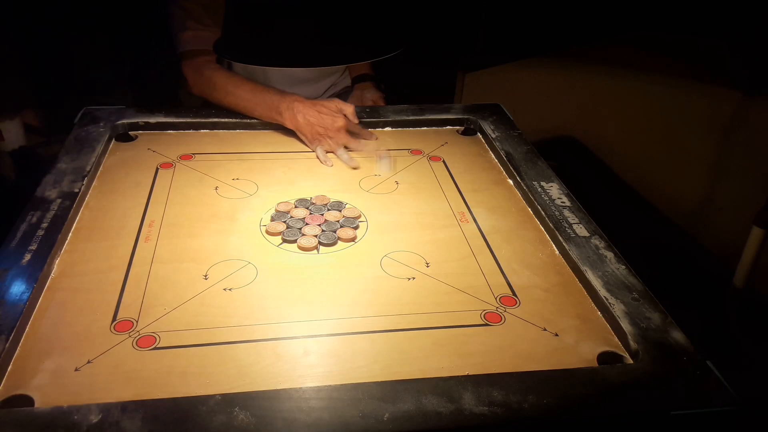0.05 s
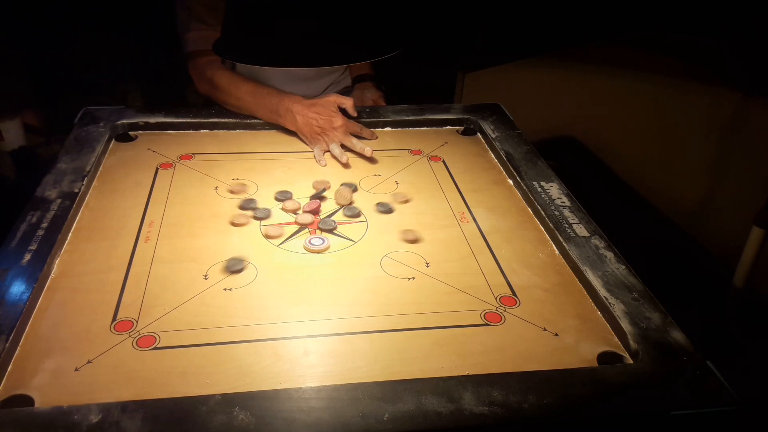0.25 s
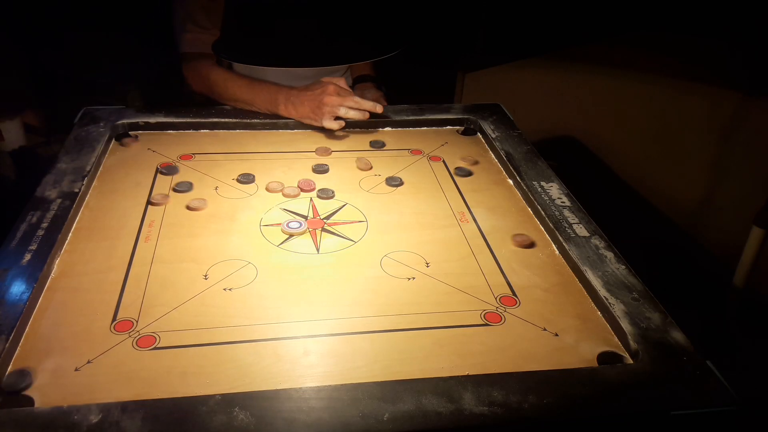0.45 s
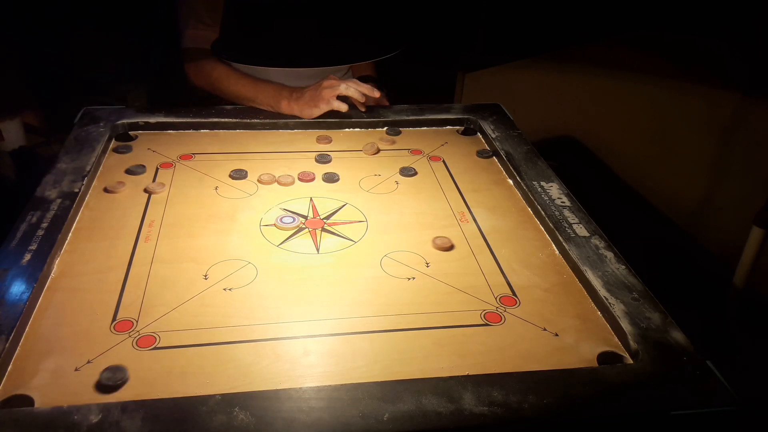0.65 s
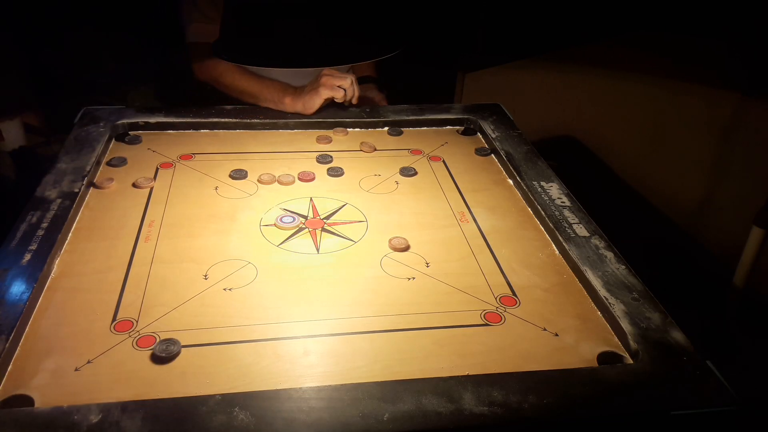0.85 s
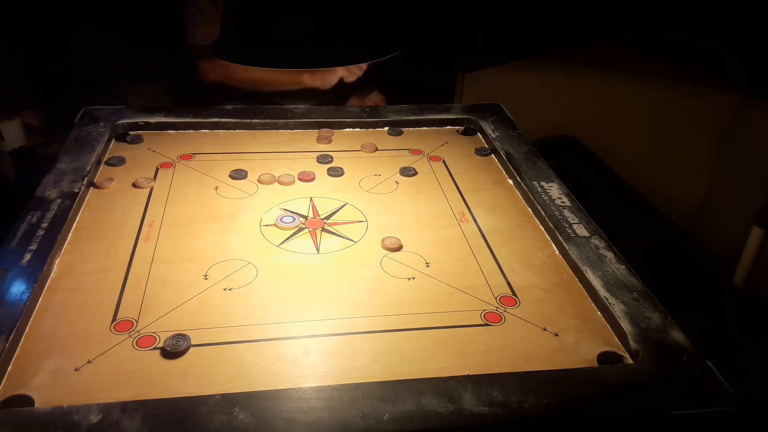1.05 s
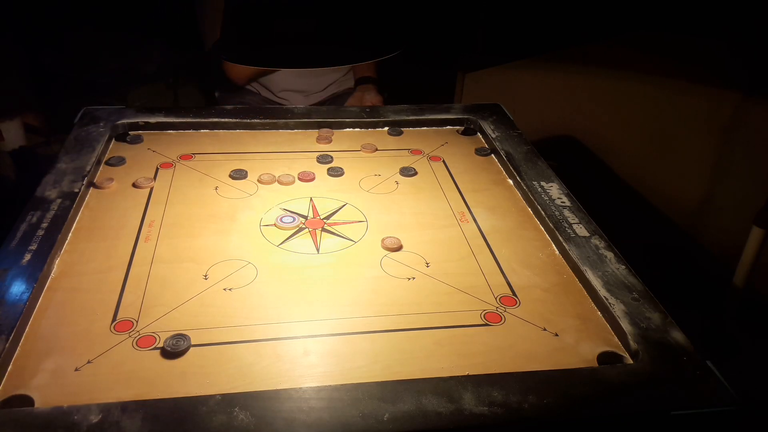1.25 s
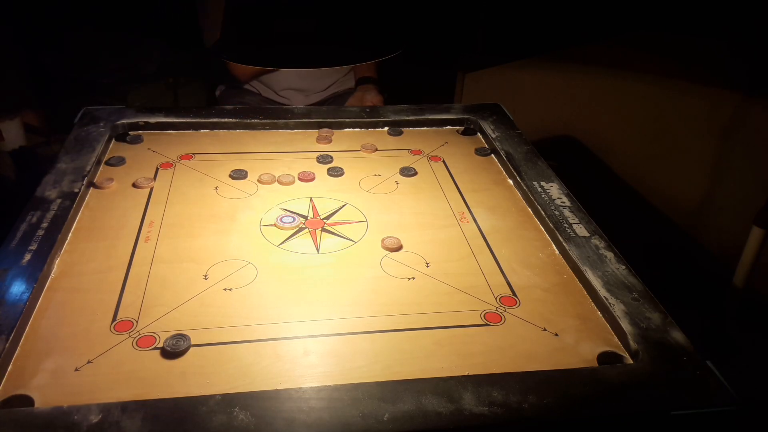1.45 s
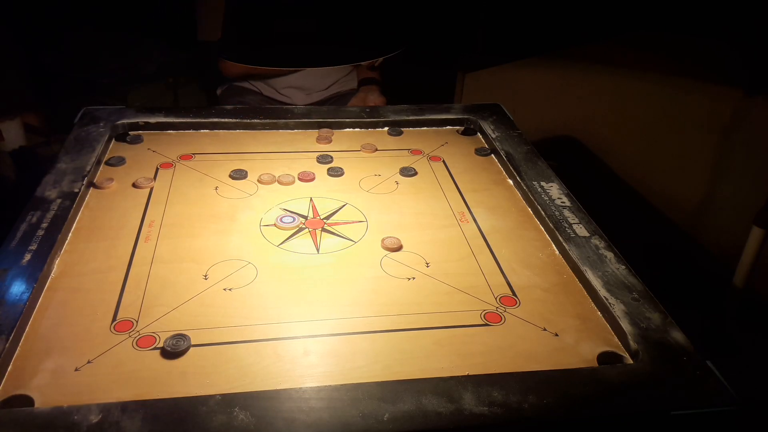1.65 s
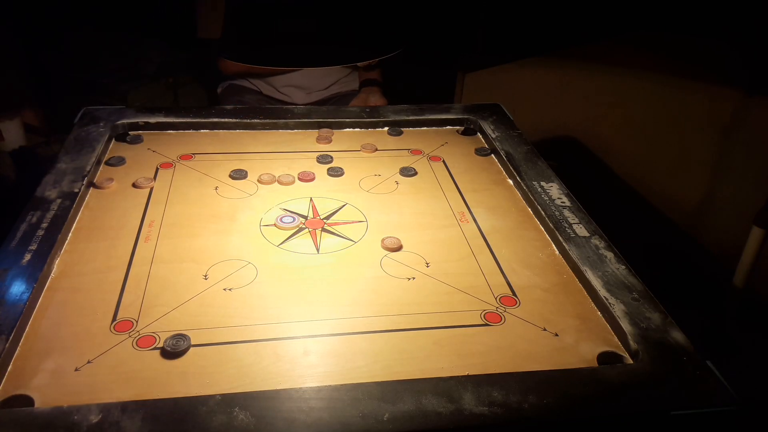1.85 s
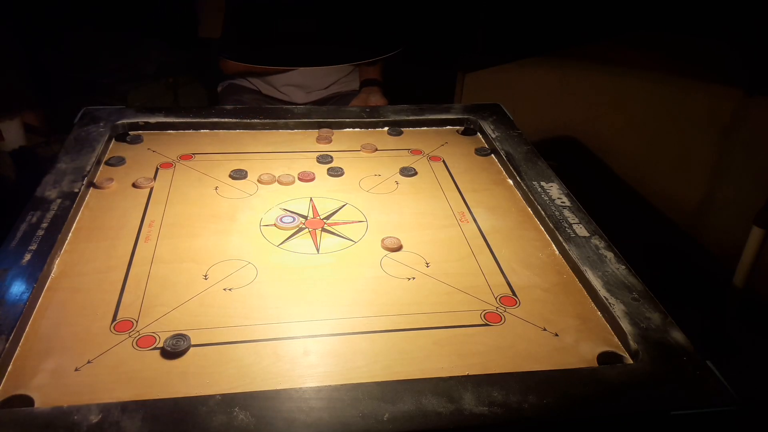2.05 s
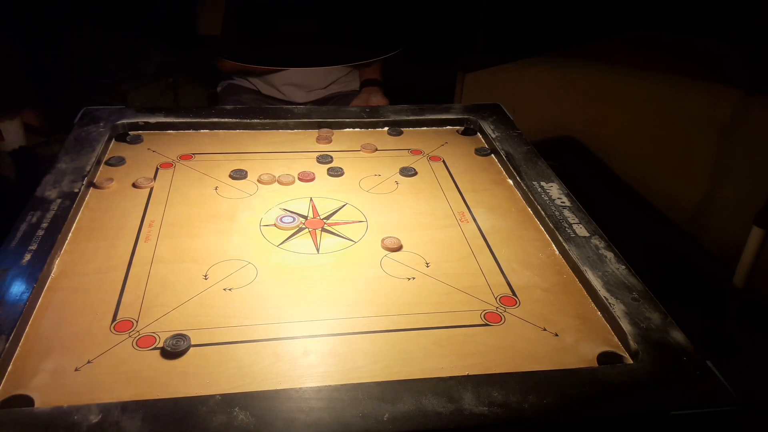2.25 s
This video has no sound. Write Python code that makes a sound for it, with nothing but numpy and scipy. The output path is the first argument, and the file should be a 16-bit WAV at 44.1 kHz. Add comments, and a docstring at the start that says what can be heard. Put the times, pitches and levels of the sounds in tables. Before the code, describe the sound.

Wooden carrom discs burst apart with a sharp crack, just after a soft flick. They clack and slide across the board, hitting the rails ever more faintly with a short room echo, until only a low room noise remains.

```python
"""Indoors, in a hard-walled room: a carrom break. After a few muffled bumps the striker cracks into a
cluster of wooden discs, and the board flexes with a thump. The discs slide apart, clack against each
other and knock on the rails; each impact excites resonant modes of the wood and reverberates in the room.
Automatic gain control ducks the steady room noise at the break and lets it swell back a second later."""
import sys
import numpy as np
from scipy import signal
from scipy.fft import rfft, irfft
from scipy.io import wavfile
from scipy.ndimage import uniform_filter1d, minimum_filter1d

SR = 44100
rng = np.random.default_rng(int(sys.argv[2]) if len(sys.argv) > 2 else 0)


def int16_out(signal):
    """Quantize to a 16-bit WAV file."""
    q = np.round(np.clip(np.atleast_2d(signal).T, -1, 1) * 32767)
    wavfile.write(sys.argv[1], SR, q.astype(np.int16))


N = 101429

# Spectral shapes, as relative power per hertz: frequency_hz, density_db
ROOM_NOISE_SPECTRUM = [(15, -47), (25, -8.5), (69, -7), (178, 0.5), (253, -8), (297, -5), (421, -7.5),
                       (552, -6), (782, -8.5), (871, -6.5), (1380, -9.5), (2850, -16), (6550, -28.5),
                       (9050, -39), (13500, -35), (15500, -43)]
BUMP_SPECTRUM = [(50, -11), (150, -10), (270, 2.5), (500, -1), (700, -8), (1500, -27), (8000, -51)]
FRICTION_SPECTRUM = [(100, -30), (700, -16), (1500, -0.5), (3000, -3), (5000, -12), (9000, -42),
                     (15000, -34)]
KNOCK_SPECTRUM = [(60, -23), (300, -16.5), (480, -12), (620, -12.5), (800, -2.5), (1000, -3), (1400, 0),
                  (2300, 0.5), (3800, -3), (5500, -13), (7000, -17), (9000, -31), (12000, -29),
                  (14500, -38), (15700, -53.5)]
CLACK_SPECTRUM = [(60, -14.5), (250, -9), (400, -12), (800, -5), (1300, -2.5), (2200, 1), (3200, 0),
                  (4600, -3), (5700, -2.5), (6600, -7.5), (7600, -9), (9200, -20.5), (10500, -20),
                  (12500, -28), (14700, -28), (15700, -36)]
CRACK_SPECTRUM = [(60, -26), (300, -20), (380, -12), (450, -7.5), (520, -13.5), (590, -3), (680, -5.5),
                  (800, -2), (1000, -6), (1400, -2), (2100, -2), (3000, -2.5), (4000, -1.5), (4700, -7.5),
                  (5600, -12), (6600, -14), (7800, -25), (9000, -30), (10500, -25), (12000, -31),
                  (14700, -32), (15700, -42)]
# Likeness of left and right room noise: frequency_hz, correlation
ROOM_NOISE_CORRELATION = [(50, 0.9), (240, 0.82), (480, 0.76), (950, -0.05), (1900, 0.021), (4000, -0.15),
                          (15000, 0.17)]
# Faint hums in the room: start_s, end_s, pitch_hz, half_width_hz, level_db
ROOM_HUMS = [(0, 2.9, 176, 21, -51), (0.7, 1.17, 288.3, 9.1, -47), (2.12, 2.7, 304, 17, -43.5)]
# Reverberation time of the room: frequency_hz, t60_s
REVERB_TIMES = [(150, 0.42), (600, 0.31), (1500, 0.42), (3000, 0.35), (6000, 0.32), (10000, 0.28),
                (15000, 0.32)]
# Soft bumps just before the shot: start_s, level_db
FLICK_BUMPS = [(0.14, -28), (0.147, -29), (0.174, -31), (0.18, -38)]
# Resonant modes: pitch_hz, relative_level_db, t60_s
RAIL_MODES = [(1141, -5, .5), (1368, 1, .4), (1430, -6, .4), (1560, -7, .25), (1643, -4, .4),
              (1935, -3, .35), (2217, -4, .4), (2248, -2, .4), (2365, -2, .35), (3740, -8, .3)]
DISC_AND_BOARD_MODES = [(582, 1, .42), (1365, 1, .5), (1542, 0, .45), (1566, -3, .45), (1994, -1, .42),
                        (2207, -4, .42), (2565, -6, .35), (2662, -6, .35), (2707, 3, .55), (2918, -4, .45),
                        (3266, -4, .35), (3535, -4, .32), (3737, -4, .3), (3898, -4, .28), (4332, -3, .3),
                        (5090, -5, .27), (5227, -5, .27)]
# Impacts: start_s, level_db, tilt_db_per_octave, left_over_right_db, attack_s
RAIL_KNOCKS = [(0.5008, -13.5, 2.5, -0.5, 0.00011), (0.5070, -18, -7, -5, 0.0015),
               (0.5172, -9, 3, -3.5, 0.00069), (0.5300, -16.5, -2.5, -12, 0.0021),
               (0.5686, -13, 1.5, -4, .0002), (0.5755, -11.5, -1, -6, 0.00092),
               (0.5870, -19, -2.5, 4, .001), (0.5955, -15, -2, -13, 0.0003),
               (0.6110, -18, -5.5, -3, 0.0014), (0.6435, -27, 1, -16, 0.0014), (0.6550, -31, 8, -4, 0.0015),
               (0.7640, -36, 6, 3, .001), (0.7780, -32.5, 1, -7, .002), (0.7900, -26, -1, -10, 0.00098),
               (0.7976, -27.5, -1.5, 0, 0.00069), (0.8460, -30.5, 1.5, 0, 0.002),
               (0.8844, -35.5, -2.5, -12, 0.0015), (0.9830, -33, 2, -9, 0.004), (1.0430, -31, 0, 0, 0.0074)]  # disc on rail
DISC_CLACKS = [(0.2925, -2, 3, 0, 0.000026), (0.2960, -6, 3.5, 2, 0.0002), (0.2982, -4.5, 0.5, -1, .0003),
               (0.3100, -17, -9, -9, 0.0002), (0.3290, -10.5, -2.5, 11, .0002),
               (0.4150, -21.5, -2.5, -15, 0.001), (0.4800, -18, -1.5, 0, 0.0037)]  # loose disc on disc
BREAK_CRACKS = [(0.2349, 2.5, 0.5, -5.5, 0.00002), (0.2362, 1.5, 0, -1, 0.00013),
                (0.2388, -4, 2.5, -8, 0.00015), (0.2415, -3.5, 1, 15, 0.0003),
                (0.2466, -5, 0.5, -10, 0.0002), (0.2492, -5.5, -2, -7, 0.00022),
                (0.2630, -8.5, 9.5, -10, .0003), (0.2700, -8.5, 2.5, 14, .0005)]  # striker and packed discs
# Imbalance of the microphone's two sides: frequency_hz, left_over_right_db
MICROPHONE_BALANCE = [(60, -4.5), (300, -4.5), (1400, -3.5), (4400, -5.5), (6800, -1.5), (9000, 7),
                      (15000, -0.5)]


def amp(db):
    """Amplitude ratio: a factor of ten for every 20 dB."""
    return 10 ** (np.asarray(db) / 20)


def unit_rms(x):
    """Power normalisation: a mean square of one."""
    return x / np.sqrt(np.mean(x ** 2) + 1e-20)


def unit_energy(x):
    """Energy normalisation: the squares of each channel sum to one."""
    return x / np.sqrt(np.sum(x ** 2, -1, keepdims=True) + 1e-20)


def curve_at(points, hz):
    """Interpolation on a logarithmic frequency axis."""
    frequencies, values = np.transpose(points)
    return np.interp(np.log(hz + 1), np.log(frequencies + 1), values)


def pan(left_over_right_db):
    """Level difference: a pair of gains that places a sound to one side."""
    return amp(np.array([[left_over_right_db], [-left_over_right_db]]) / 2)


def decay(t, t60_s):
    """Exponential damping: the level falls 60 dB in t60_s."""
    return np.exp(-np.log(1000) * t / np.maximum(t60_s, 1e-3))


def add(mix, start_s, level_db, sound):
    """Superposition: a sound of unit energy enters at level_db, its energy counted over 10 ms."""
    part = mix[:, round(start_s * SR):][:, :sound.shape[1]]
    part += amp(level_db) * np.sqrt(SR / 100) * sound[:, :part.shape[1]]


def coloured(x, spectrum, tilt_db_per_octave=0):
    """Minimum-phase filtering: a causal response of unit energy imposes a spectral shape."""
    hz = abs(np.fft.fftfreq(2048, 1 / SR))
    octaves = np.log2(np.clip(hz, 500, 9000))
    log_gain = np.log(amp(curve_at(spectrum, hz) + tilt_db_per_octave * octaves))
    response = np.exp(np.conj(signal.hilbert(log_gain)))
    taps = np.fft.ifft(response).real[:len(hz) // 2]
    return signal.fftconvolve(x, unit_energy(taps)[None], axes=1)[:, :x.shape[1]]


def room_noise(level_db=-34.5, patch_db=1, flicker_db=0.6):
    """Partial coherence: steady noise, alike on both sides in the bass, with slight drifting patches."""
    frames, hz = N // 256 + 5, np.fft.rfftfreq(1024, 1 / SR)
    left_re, left_im, other_re, other_im, patches = rng.standard_normal((frames, len(hz), 5)).T
    patches = unit_rms(uniform_filter1d(uniform_filter1d(patches, size=12, axis=0), size=12, axis=1))
    flicker = unit_rms(uniform_filter1d(rng.standard_normal(frames), size=4))
    correlation = np.clip(curve_at(ROOM_NOISE_CORRELATION, hz), -1, 1)[:, None]
    left = left_re + 1j * left_im
    right = correlation * left + np.sqrt(1 - correlation ** 2) * (other_re + 1j * other_im)
    gain = amp(curve_at(ROOM_NOISE_SPECTRUM, hz)[:, None] + patch_db * patches + flicker_db * flicker)
    noise = signal.istft(np.array([left, right]) * gain, nperseg=1024, noverlap=768)[1][:, :N]
    return amp(level_db) * unit_rms(noise)


def room_hums(fade_s=0.048):
    """Narrow-band noise: neighbouring frequencies beat and are heard as a wavering tone."""
    out, t, hz = np.zeros(N), np.arange(N) / SR, np.fft.rfftfreq(N, 1 / SR)
    for start_s, end_s, pitch_hz, half_width_hz, level_db in ROOM_HUMS:
        band = np.exp(-((hz - pitch_hz) / half_width_hz) ** 2)
        tone = unit_rms(irfft(rfft(rng.standard_normal(N)) * band, N))
        out += amp(level_db) * tone * np.clip(np.minimum(t - start_s, end_s - t) / fade_s, 0, 1)
    return out


def reverberation(t, rise_s=0.0019):
    """Diffuse field: dense reflections build up quickly and die sooner in the treble."""
    hz, frame_s, bands = signal.stft(rng.standard_normal((2, len(t))), SR, nperseg=256)
    damped = bands * decay(frame_s, curve_at(REVERB_TIMES, hz)[:, None])
    tail = signal.istft(damped, SR, nperseg=256)[1][:, :len(t)]
    return unit_energy(tail * (1 - np.exp(-t / rise_s)))


def flick_bumps(stereo_spread=0.72, t60_s=0.067):
    """Heavy damping: brief, muffled bumps as the player flicks."""
    out, t = np.zeros((2, N)), np.arange(SR // 2) / SR
    for start_s, level_db in FLICK_BUMPS:
        noise = rng.standard_normal(len(t)) + stereo_spread * rng.standard_normal((2, len(t)))
        add(out, start_s, level_db, unit_energy(coloured(noise * decay(t, t60_s), BUMP_SPECTRUM)))
    return out


def sliding_discs(start_s=0.34, rest_s=1.46, level_db=-34, grain_db=4.0):
    """Sliding friction: grainy noise whose power follows the speed as the discs slow evenly to rest."""
    t = np.arange(N) / SR
    speed = np.clip((rest_s - t) / (rest_s - start_s), 0, 1) * (t > start_s)
    grain = amp(grain_db * unit_rms(uniform_filter1d(rng.standard_normal(N), size=400)))
    friction = unit_rms(coloured(grain * rng.standard_normal((2, N)), FRICTION_SPECTRUM))
    return amp(level_db) * np.sqrt(speed) * friction


def board_thump(start_s=0.2345, level_db=-12.5, contact_s=0.0046, spring_hz=79, boom_db=-17):
    """Elastic rebound: the break pushes the board down and it springs back; the room booms faintly."""
    out, t = np.zeros((2, N)), np.arange(SR // 2) / SR
    push = -np.sin(np.pi * np.minimum(t / contact_s, 1)) ** 2
    flex = unit_energy(signal.sosfilt(signal.butter(2, spring_hz, "high", fs=SR, output="sos"), push))
    reflections = rng.standard_normal((2, len(t))) * decay(t, t60_s=1.0)
    boom = unit_energy(signal.fftconvolve(reflections, flex[None], axes=1)[:, :len(t)])
    add(out, start_s, level_db, flex * pan(left_over_right_db=-17) + amp(boom_db) * boom)
    return out


def disc_impacts(events, spectrum, modes, tick_db, ring_db, body_db=-2, room_db=-0.5):
    """Impact excitation: a contact tick, a burst of dense wood modes, longer rings and reverberation."""
    out, t = np.zeros((2, N)), np.arange(SR * 3 // 5) / SR
    impulse = t == 0
    rings = np.array([amp(db) * decay(t, t60_s) * np.exp(2j * np.pi * hz * t) for hz, db, t60_s in modes])
    for start_s, level_db, tilt, side_db, attack_s in events:
        tick = coloured(amp(tick_db) * pan(side_db) * impulse, spectrum, tilt + 3)  # 3 dB/octave brighter
        burst = unit_energy(rng.standard_normal((2, len(t))) * decay(t, t60_s=0.037))
        body = amp(body_db) * pan(side_db) * burst
        phases = np.exp(2j * np.pi * rng.random((2, len(modes))))
        ring = amp(ring_db) * unit_energy((phases @ rings).real)
        body_in_room = coloured(body + amp(room_db) * reverberation(t), spectrum, tilt)
        attack = 1 - np.exp(-t / max(attack_s, 1e-5))
        add(out, start_s, level_db, (tick + body_in_room + ring) * attack)
    return out


def scene():
    """Linear superposition: the sound pressures of the game and the room add."""
    cracks = disc_impacts(BREAK_CRACKS, CRACK_SPECTRUM, DISC_AND_BOARD_MODES, tick_db=-6.5, ring_db=-6.5)
    clacks = disc_impacts(DISC_CLACKS, CLACK_SPECTRUM, DISC_AND_BOARD_MODES, tick_db=-8.5, ring_db=-11)
    knocks = disc_impacts(RAIL_KNOCKS, KNOCK_SPECTRUM, RAIL_MODES, tick_db=-12.5, ring_db=-4.5)
    game = cracks + clacks + knocks + sliding_discs() + board_thump() + flick_bumps()
    return game + room_noise() + room_hums()


def microphone(x, low_cut_hz=47.3):
    """Frequency response: the right side is more sensitive except in the high treble; deep bass is cut."""
    hz = np.fft.rfftfreq(2 * N, 1 / SR)
    sensitivity = amp(np.outer([1, -1], curve_at(MICROPHONE_BALANCE, hz)) / 2)
    picked_up = irfft(rfft(x, 2 * N) * sensitivity)[:, :N]
    return signal.sosfilt(signal.butter(2, low_cut_hz, "high", fs=SR, output="sos"), picked_up)


def gain_control(x, threshold_db=-15, max_duck_db=15, ahead_s=0.016, hold_s=1.07, recover_db_per_s=22):
    """Compression: the gain drops just ahead of a loud peak, holds, then recovers slowly."""
    t = np.arange(N) / SR
    power_db = 10 * np.log10(abs(uniform_filter1d((x ** 2).mean(0), size=128)) + 1e-12)
    excess_db = np.interp(t + ahead_s, t, np.clip(power_db - threshold_db, 0, max_duck_db))
    hold_samples = int(hold_s * SR) // 2 * 2 + 1
    held_db = -minimum_filter1d(-excess_db, hold_samples, mode="constant", origin=hold_samples // 2)
    duck_db = np.maximum.accumulate(held_db + recover_db_per_s * t) - recover_db_per_s * t
    return x / amp(uniform_filter1d(duck_db, size=600))


def record(dry, ceiling=0.85, band_limit_hz=15600):
    """Saturation and band limiting: after microphone and gain control, peaks and top treble are cut."""
    ducked = gain_control(microphone(dry))
    soft_clipped = ducked / (1 + (ducked / ceiling) ** 6) ** (1 / 6)
    low_pass = signal.firwin(255, band_limit_hz, window=("kaiser", 8), fs=SR)
    return signal.oaconvolve(soft_clipped, low_pass[None], "same")


dry = scene()
out = record(dry)
int16_out(out)
```